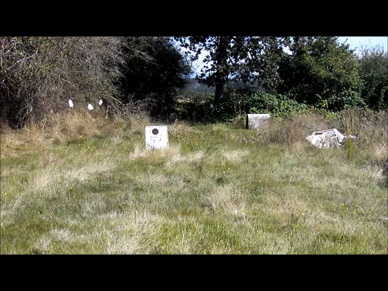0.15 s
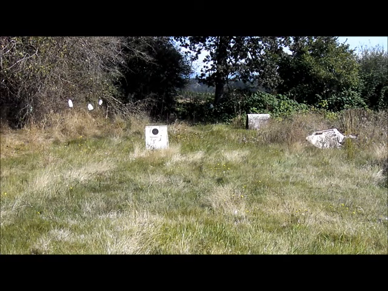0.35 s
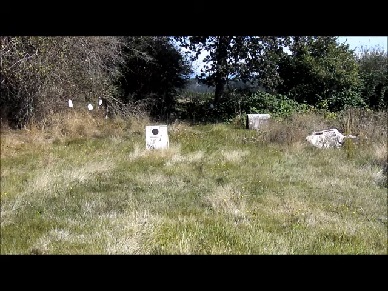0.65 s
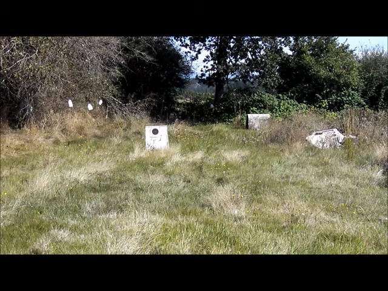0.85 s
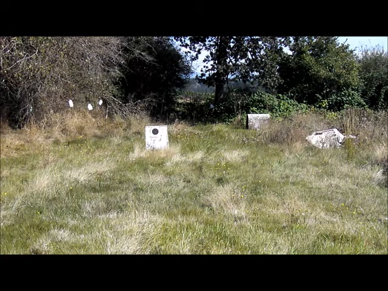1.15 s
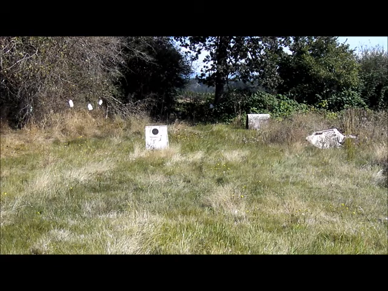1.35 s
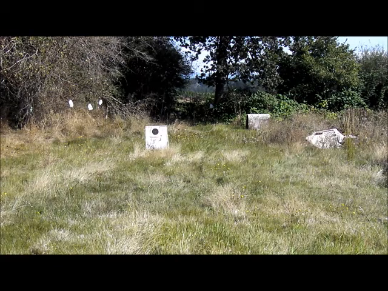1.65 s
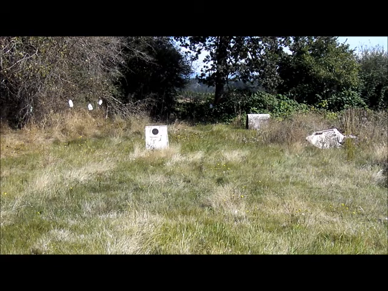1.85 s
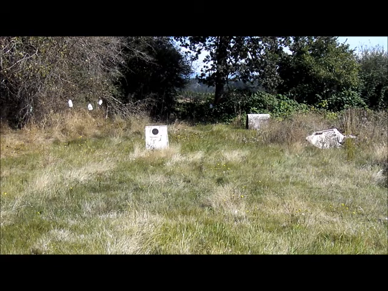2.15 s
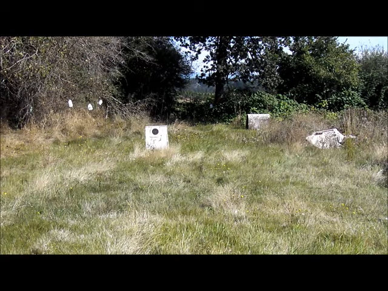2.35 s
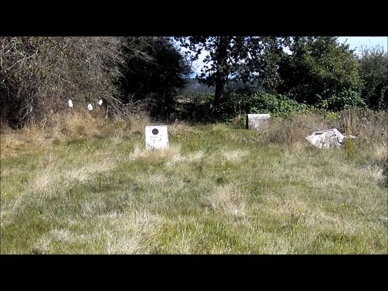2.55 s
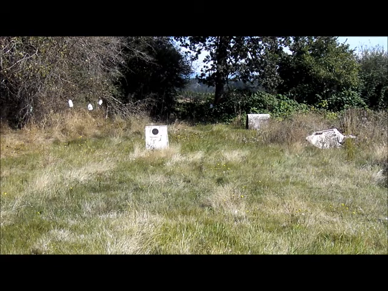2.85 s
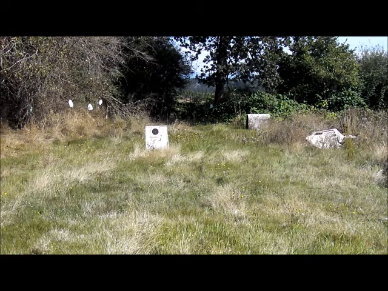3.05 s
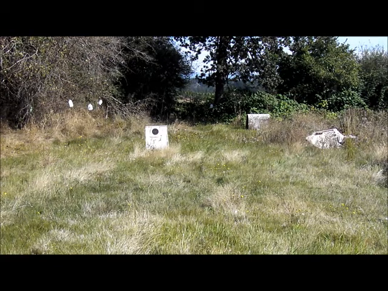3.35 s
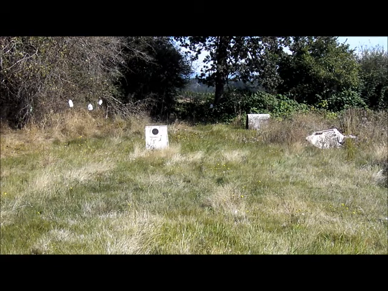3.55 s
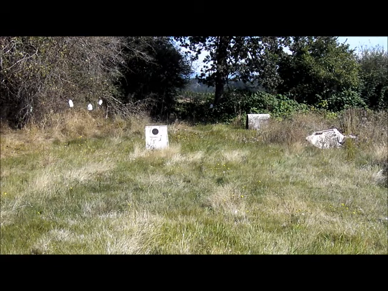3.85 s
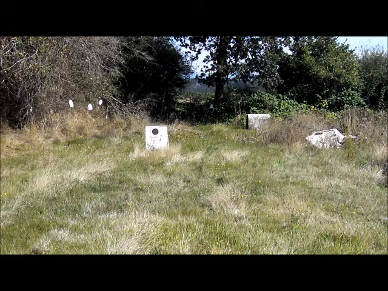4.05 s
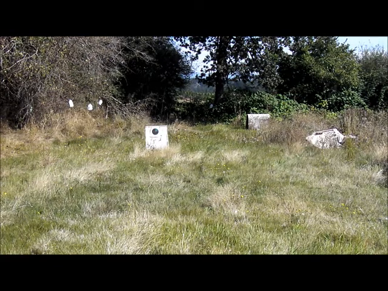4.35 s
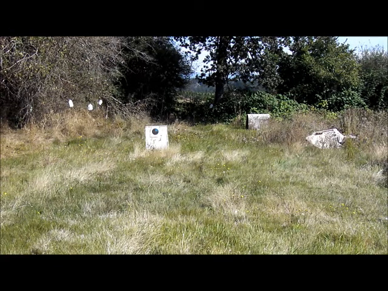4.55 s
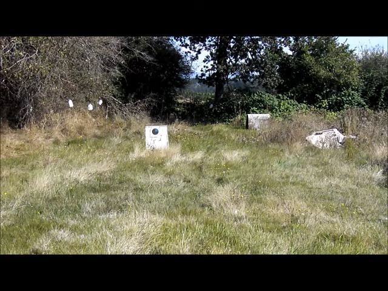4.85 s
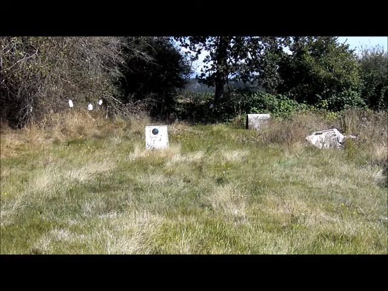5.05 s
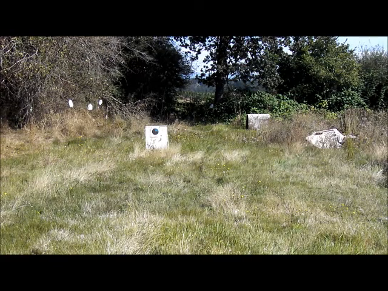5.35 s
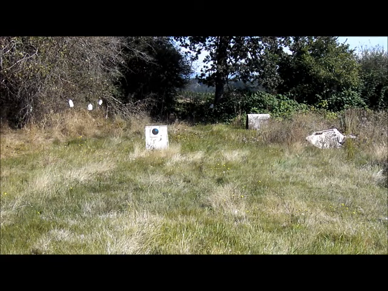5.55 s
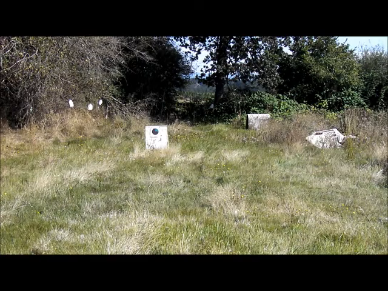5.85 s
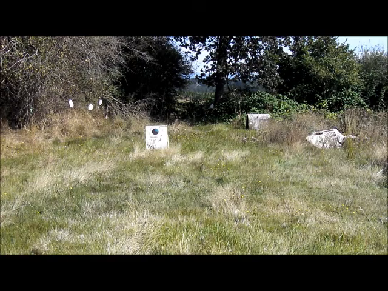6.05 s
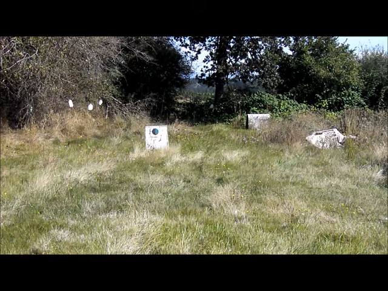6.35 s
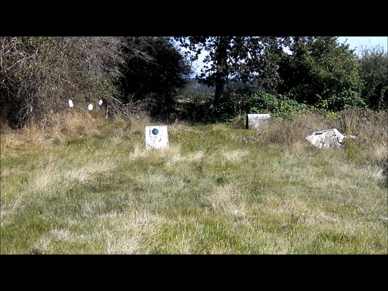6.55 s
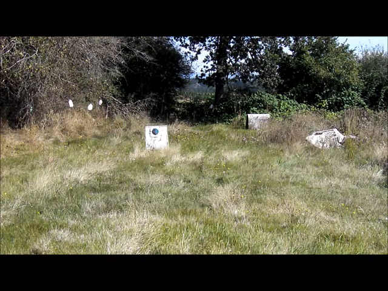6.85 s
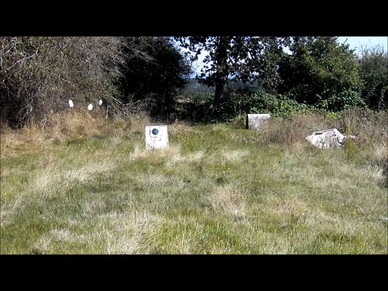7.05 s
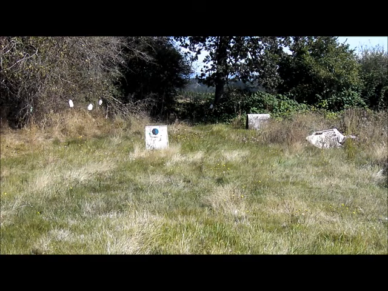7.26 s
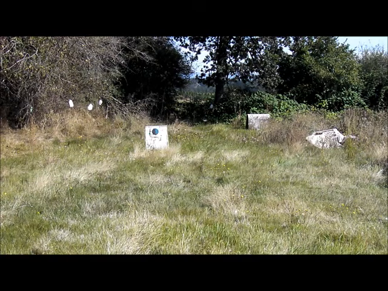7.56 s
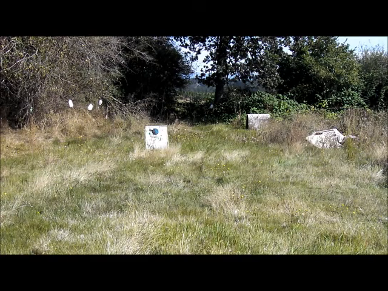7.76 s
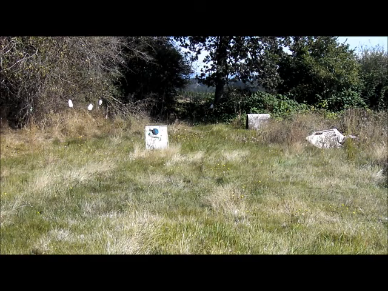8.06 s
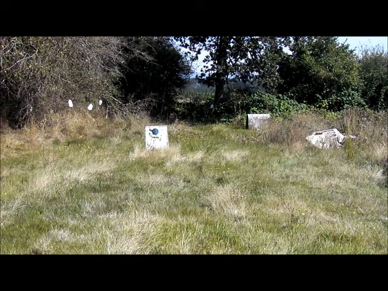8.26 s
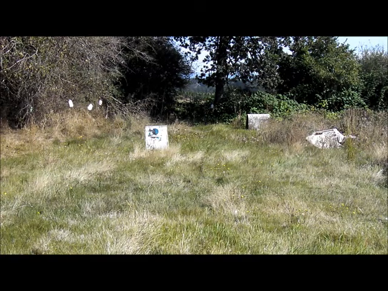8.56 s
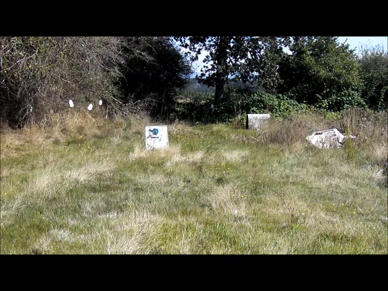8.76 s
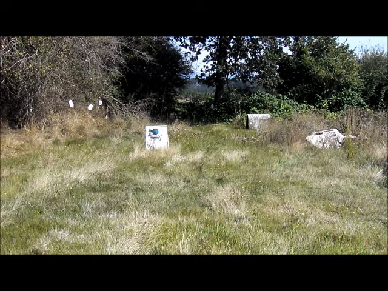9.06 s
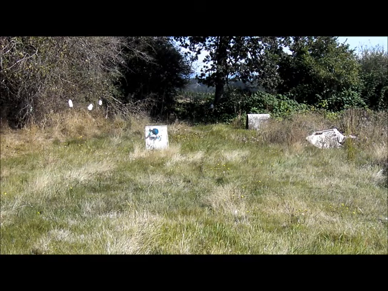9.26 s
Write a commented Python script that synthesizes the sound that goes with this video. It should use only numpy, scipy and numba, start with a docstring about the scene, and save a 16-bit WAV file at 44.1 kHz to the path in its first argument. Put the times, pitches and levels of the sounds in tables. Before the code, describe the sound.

In a quiet open field, gear rustles briefly. An electronic paintball marker then fires spaced single shots close to the microphone, followed by short bursts and finally a fast, even stream. Each shot is a sharp pop with a puff of gas and a bolt clack. The balls crack against a board a moment later, and trees and bushes return short echoes. The loudest peaks distort slightly.

```python
"""Paintball across a grassy field

An electronic paintball marker fires single shots, short bursts, then a steady stream at a board.
Each cycle is a valve knock, a hiss of gas, the muzzle blast and the clack of the returning bolt.
The balls crack on the board; trees and bushes throw the sound back. A rustle of gear comes first.
The microphone is close: its gain control ducks after loud blasts and the peaks distort."""
import sys
import numpy as np
from scipy import signal
from scipy.fft import rfft, irfft, next_fast_len
from scipy.io import wavfile
from scipy.ndimage import uniform_filter1d
from numba import njit

SR = 44100
rng = np.random.default_rng(int(sys.argv[2]) if len(sys.argv) > 2 else 0)


def inscribe(sig):
    """Save sig as 16-bit PCM at rate SR to the path in sys.argv[1].

    A 1-D sig is mono; a 2-D sig holds one channel per row.
    Samples are clipped to [-1, 1] before scaling.
    """
    pcm = np.round(np.clip(np.atleast_2d(sig).T, -1, 1) * 32767)
    wavfile.write(sys.argv[1], SR, pcm.astype(np.int16))


N = 414981

# tone of the open air: (f/Hz, level/dB)
AIR_COLOUR = [(18, -68), (30, -49), (64, -15), (134, -9.5), (165, -3.5), (194, -6.5), (449, -2), (499, -1),
              (1460, -10.5), (3400, -16.5), (3670, -15.5), (8080, -22), (14800, -23.5), (16000, -26)]
# tail of a shot in the trees: (delay t/s, level/dB), and its tone: (f/Hz, level/dB)
TREE_TAIL = [(0, -47), (0.01, 15.5), (0.05, 5), (0.111, 7), (.16, 6.5), (.2, -1), (.27, -1), (.36, -7.5),
             (.6, -13.5), (1.1, -34)]
TREE_COLOUR = [(100, -31), (330, -10.5), (560, -5.5), (750, -0.5), (1000, -0.5), (1700, -2.5), (2400, 2.5),
               (5500, 0.5), (9000, 4), (12500, 0.5), (16000, -5)]
# tail of a hit in the bushes: (delay t/s, level/dB), and its tone: (f/Hz, level/dB)
BUSH_TAIL = [(0, 31), (0.019, -43), (0.026, 8.5), (0.054, -0.5), (0.081, -5), (.15, -7), (.25, -17),
             (.45, -28), (.9, -45)]
BUSH_COLOUR = [(150, -16), (700, 0), (1300, 5.5), (1900, 9), (3200, 6), (6000, -2.5), (10000, -14.5),
               (16000, -24)]
# envelope of the gear rustle: (t/s, body level/dB, treble level/dB)
RUSTLE_ENVELOPE = [(0.285, -82, -77), (0.303, -26.5, -33), (0.323, -31.5, -48), (0.457, -18.5, -33),
                   (0.493, -21, -41), (0.553, -10.5, -26), (0.567, -18, -43), (0.649, -26, -54),
                   (0.7, -41, -69)]
# sharper jolts of the gear: (t/s, level/dB)
GEAR_JOLTS = [(0.347, -18), (0.4, -19), (0.523, -12.5), (0.54, -16), (0.655, -21), (0.715, -26.5),
              (0.755, -29)]
# dull rub and fine hiss of the gear: (f/Hz, level/dB)
RUB_COLOUR = [(47, -76), (80, -46), (151, -37), (176, -31), (339, -0.5), (451, -5), (562, -3), (641, -9),
              (747, -4), (971, -2.5), (1110, 1), (2140, -13), (2280, -17), (3860, -31.5), (15000, -68)]
HISS_COLOUR = [(200, -60), (1500, -3), (3500, 5), (6000, -4.5), (14000, -27)]
# balls landing after about .36 s of flight: (t/s, level/dB, ring f/Hz, echo level/dB)
BALL_HITS = [(2.4563, 4, 2320, -0.5), (3.0805, 5, 3130, -8), (3.7412, 3.5, 3940, -1.5),
             (4.4135, 5, 2200, 1.5), (4.466, -7, 2040, 1.5), (5.253, 6, 2420, 2.5), (5.7755, 5, 4480, 2.5),
             (6.0443, -2, 2820, -11), (6.2554, 0.5, 5360, -8.5), (6.3317, -8, 4460, -6),
             (6.425, -7, 3700, -0.5), (6.514, 5.5, 2100, 3.5), (6.575, -6, 4650, 5),
             (6.6775, -2.5, 3970, 0), (6.7394, -3, 3000, 0.5), (7.415, 2.5, 2850, 0), (7.469, -4, 2320, 0),
             (7.5667, -10, 2710, -6), (7.625, -12, 2610, -6.5), (7.7212, -14, 2970, -7),
             (7.8137, 0, 2530, -3), (7.897, 1.5, 2870, 0), (7.98, -5.5, 2714, -4), (8.051, -0.5, 2730, -10),
             (8.1535, 6, 2050, -3), (8.2316, 7, 2990, -7), (8.302, 5.5, 3774, -1.5), (8.3872, 5, 3700, -6),
             (8.4423, -1, 2660, 2.5), (8.5476, -0.5, 3600, 2), (8.6074, 3.5, 2226, -1.5),
             (8.6772, -4.5, 1500, -2), (8.7632, 4, 2970, 0), (8.8593, 3.5, 3300, -10), (8.9201, 4, 2080, 1),
             (8.994, -0.5, 2050, 0.5), (9.0783, -5, 3630, -0.5), (9.1653, -2.5, 4545, -0.5),
             (9.2462, -2.5, 2727, -4), (9.3223, -10, 2220, -5)]
# tone of the bursting paint, and the scooped mids of the board: (f/Hz, level/dB)
SPLAT_COLOUR = [(100, -58), (500, 6), (1200, 1), (2400, 10), (4500, 6.5), (7000, -2), (11000, -8),
                (16000, -7.5)]
BOARD_COLOUR = [(60, 5), (400, -4.5), (1000, -4), (2000, -1.5)]
# trigger and switch clicks: (t/s, level/dB)
TRIGGER_TICKS = [(0.3, -27), (2.048, -23), (2.059, -20), (4.883, -30), (7.005, -16)]
# runs of evenly spaced shots; the last two shots end the stream with a heavier thump:
# (first blast t/s, shot count, blast level/dB, gas level/dB, air push level/dB)
SHOT_RUNS = [(2.0824, 1, -4.5, -1.5, 5.5), (2.7371, 1, -6, -0.7, -36), (3.362, 1, -2.5, -1.5, 8.5),
             (4.0389, 3, -1.5, -3, -21), (4.8948, 1, -2, -4.5, -16), (5.4131, 1, -1, -1.5, 2),
             (5.6727, 1, -7, -3.5, -5), (5.9025, 7, -1, -1.5, -16), (7.0381, 5, -0.5, -3, -14),
             (7.4599, 14, 0, -2, -12), (8.5745, 9, 1.5, 1, -21), (9.286, 2, -5, -1.3, 3.5)]
# modes of barrel and body, and of the bolt on its stop: (f/Hz, level/dB, 60 dB decay t/s)
BARREL_MODES = [(336.6, 0, 0.016), (343, -17, 0.069), (412, -6, 0.018), (530.3, -11, 0.041),
                (882, -12, 0.031), (1175, -17, 0.022), (1970, -3.5, 0.0033)]
BOLT_MODES = [(1850, -15, 0.0094), (3453, -4, 0.019), (3670, -3.5, 0.011), (5100, -10, 0.0096),
              (8400, -8, 0.011)]
# tone of the gas, the valve knock and the ball's scrape: (f/Hz, level/dB)
GAS_COLOUR = [(200, -43), (700, 15.5), (1500, 9.5), (3000, -1), (4800, 0), (6000, 2), (8000, -8.5),
              (10000, -9.5), (16000, -14.5)]
KNOCK_COLOUR = [(150, -30), (350, -6), (700, 2.5), (950, 12.5), (1400, 4), (2500, -19)]
SCRAPE_COLOUR = [(300, 1), (900, -5), (1600, -16), (3000, -13), (9000, -23)]
# overall tone of the marker: less bass, a slight dip near 720 Hz, brighter top: (f/Hz, level/dB)
MARKER_COLOUR = [(40, -7.5), (140, -4.5), (280, 2.5), (560, -.5), (720, -1), (900, 0), (16000, 3.5)]

SHOT_PERIOD_S = .0791  # steady fire while the trigger is held


def undb(db):
    """Decibels to gain."""
    return 10 ** (np.asarray(db) / 20)


def unit(x):
    """Scale to rms 1."""
    return x / np.sqrt(np.mean(x ** 2))


def clock(seconds):
    """Sample times of a short sound."""
    return np.arange(int(seconds * SR)) / SR


def add(track, s, x):
    """Mix x into the track at time s."""
    i = int(round(s * SR))
    x = x[:max(len(track) - i, 0)]
    track[i:i + len(x)] += x


def colour(x, points):
    """EQ through (f/Hz, level/dB) points."""
    hz, db = np.transpose(points)
    size = next_fast_len(len(x) + SR // 10)
    f = np.maximum(np.arange(size // 2 + 1) * SR / size, 1)
    gain = undb(np.interp(np.log(f), np.log(hz), db))
    return irfft(rfft(x, size) * gain, size)[:len(x)]


def noise(points, size):
    """Coloured noise of rms 1."""
    return unit(colour(rng.standard_normal(size), points))


def drift(rate_hz):
    """Smoothed random steps of rms 1."""
    step = int(SR / rate_hz)
    stairs = np.repeat(rng.standard_normal(N // step + 1), step)
    return unit(uniform_filter1d(stairs, step)[:N])


def field_air(level_db=-47, waver_db=.5):
    """A quiet bed of open air, wavering slightly."""
    return undb(level_db + waver_db * drift(6)) * noise(AIR_COLOUR, N)


def tree_echo(shots, level_db=-17, patchy_db=2):
    """Foliage scatters each shot into countless small reflections: a patchy, fading tail."""
    delay, db = np.transpose(TREE_TAIL)
    t = clock(1)
    tail = noise(TREE_COLOUR, len(t))
    tail *= undb(np.interp(t, delay, db) + patchy_db * drift(90.4)[:len(t)])
    tail /= np.sqrt(np.sum(tail ** 2))
    return undb(level_db) * signal.fftconvolve(shots, tail)[:N]


def gear_rustle(grain_db=2.5, rub_db=-1, hiss_db=-1, catch_db=2, catch_s=.0034, catches_per_s=32):
    """Gear rubs as the marker is raised: dull grains, small random catches and a few jolts."""
    t = np.arange(N) / SR
    s, body_db, treble_db = np.transpose(RUSTLE_ENVELOPE)
    body, treble = (undb(np.interp(t, s, db, left=-120, right=-120)) for db in (body_db, treble_db))
    catch = np.exp(-clock(.04) / catch_s)
    snags = 1. * (rng.random(N) < catches_per_s / SR)
    catches = signal.fftconvolve(snags, catch)[:N]
    grains = unit(undb(grain_db * drift(260)) + undb(catch_db) * catches)
    force = undb(rub_db) * body * grains
    for when, db in GEAR_JOLTS:
        add(force, when, undb(db) * catch)
    friction = rng.standard_normal(N)
    rub = colour(force * friction, RUB_COLOUR) / np.std(colour(friction, RUB_COLOUR))
    hiss = undb(hiss_db) * treble * grains * noise(HISS_COLOUR, N)
    return rub + hiss


def shell_crack(hz, ring_db=3.5, ring_s=.0014, splat_db=2, burst_s=.00087, spray_db=-21, spray_s=.0096):
    """A shell bursts in about a millisecond, rings the board briefly and sprays paint."""
    t = clock(.04)
    tone = undb(ring_db) * np.sin(2 * np.pi * hz * t) * np.exp(-t / ring_s)
    splat = undb(splat_db) * np.exp(-(t / burst_s) ** 2 / 2)
    spray = undb(spray_db) * np.exp(-t / spray_s)
    return tone + (splat + spray) * noise(SPLAT_COLOUR, len(t))


def board_hits(crack_db=4, crush_s=.0006, wash_db=-24, patchy_db=2,
               slap_db=-11, slap_delay_s=.0462, slap_s=.0065):
    """Each ball flattens and cracks; bushes return a wash, a hard face behind the board one slap."""
    cracks, slaps, wash_power = np.zeros((3, N))
    t = clock(.9)
    delay, tail_db = np.transpose(BUSH_TAIL)
    tail = undb(wash_db + np.interp(t, delay, tail_db))
    for s, db, hz, echo_db in BALL_HITS:
        burst_at = s + crush_s
        add(cracks, burst_at, undb(crack_db + db) * shell_crack(hz))
        add(slaps, burst_at + slap_delay_s, undb(slap_db + echo_db) * np.exp(-t / slap_s))
        add(wash_power, burst_at, (undb(echo_db) * tail) ** 2)
    wash = np.sqrt(wash_power) * undb(patchy_db * drift(600))
    echoes = (slaps + wash) * noise(BUSH_COLOUR, N)
    return colour(cracks + echoes, BOARD_COLOUR)


def ring(modes, contact_s, scatter_db=1, detune=.018):
    """Modes rung by one push; a longer contact is duller, and no two pushes are quite alike."""
    t = clock(.06)
    scatter = rng.standard_normal((len(modes), 2)) * [scatter_db, detune]
    tones = sum(undb(db + extra_db - 60 * t / t60) * np.cos(2 * np.pi * hz * (1 + shift) * t)
                for (hz, db, t60), (extra_db, shift) in zip(modes, scatter))
    push = t * np.exp(-t / max(contact_s, 1 / SR))
    return signal.fftconvolve(tones, push / push.sum())[:len(t)]


def gas_hiss(lead_s, leak_db=-18, jet_db=2, rise_s=.00094, jet_s=.0054,
             gulp_db=3, gulp_s=.00286, after_db=-18, fade_s=.007):
    """Gas leaks past the ball, swells as it nears the muzzle, jets out in gulps and dies away."""
    t = clock(.08) - lead_s
    before, after = np.maximum(-t, 0), np.maximum(t, 0)
    slosh_db = gulp_db * np.cos(2 * np.pi * after / gulp_s)  # pressure sloshes along the barrel
    jet = undb(jet_db + slosh_db) * np.exp(-before / rise_s - (after / jet_s) ** 2 / 2)
    leak = np.where(t < 0, undb(leak_db), undb(after_db) * np.exp(-after / fade_s))
    return noise(GAS_COLOUR, len(t)) * (jet + leak)


def air_push(rise_s=.0017, width_s=.012):
    """Muzzle air strikes the microphone: a quick push that lets go more slowly."""
    t = clock(width_s)
    return t / rise_s * np.exp(1 - t / rise_s) * np.cos(np.pi / 2 * t / t[-1])


def firings(blast_scatter_db=.97, gas_scatter_db=.44, push_scatter_db=2):
    """Every shot, each a little different: (t/s, blast level/dB, gas level/dB, air push level/dB)."""
    shots = np.array([(s + k * SHOT_PERIOD_S, db, gas_db, air_db)
                      for s, count, db, gas_db, air_db in SHOT_RUNS for k in range(round(count))])
    scatter = [0, blast_scatter_db, gas_scatter_db, push_scatter_db]
    return shots + rng.standard_normal(shots.shape) * scatter


def marker(valve_db=-5, scrape_db=-17, shove_db=3, blast_db=14, ground_db=-12, push_db=7,
           cycle_s=.037, bolt_db=-8, clack_db=-7.5, rebound_db=-10):
    """The valve opens, gas drives the ball out, the blast rings the barrel and the bolt comes home."""
    out, t = np.zeros(N), clock(.012)
    scrape_swell = np.sin(np.pi * t / t[-1]) ** 2
    shove = np.exp(-((t - .001) / .00014) ** 2)
    for k, (s, db, gas_db, air_db) in enumerate(firings()):
        lead_s = .0195 if k == 0 else .0157  # time in the barrel, longer on the cold first shot
        valve_at = s - lead_s
        # the solenoid opens the valve, which knocks the body
        knock = colour(ring(BARREL_MODES, contact_s=.00007), KNOCK_COLOUR)
        add(out, valve_at, -undb(valve_db) * knock)
        add(out, valve_at, undb(gas_db) * gas_hiss(lead_s))
        # the ball scrapes down the barrel and shoves air out just ahead of the blast
        scrape = scrape_swell * noise(SCRAPE_COLOUR, len(t))
        add(out, s - t[-1], undb(scrape_db + gas_db) * scrape)
        add(out, s - .002, undb(shove_db + db) * shove)
        blast = -undb(db) * ring(BARREL_MODES, contact_s=.00005)
        add(out, s, undb(blast_db) * blast)
        add(out, s + .0067, -undb(ground_db) * blast)  # bounce off the ground
        add(out, s - .0005, undb(push_db + air_db) * air_push())
        # the bolt clacks home and rebounds softly off its bumper; from rest it sticks and is late
        home_at = valve_at + cycle_s + (.016 if k == 0 else 0)
        add(out, home_at, undb(bolt_db) * ring(BARREL_MODES, contact_s=.00007))
        add(out, home_at, undb(clack_db) * ring(BOLT_MODES, contact_s=.00002))
        add(out, home_at + .0031, undb(rebound_db) * ring(BARREL_MODES, contact_s=.0001))
    for s, db in TRIGGER_TICKS:
        add(out, s, undb(db) * ring(BOLT_MODES, contact_s=.00002))
    return colour(out, MARKER_COLOUR)


def scene():
    """Marker, board, echoes and gear over the quiet of the field."""
    shots = marker()
    return (shots + tree_echo(shots) + field_air() + board_hits() + gear_rustle())[None]


@njit
def follow(x, attack, hold, release):
    """Envelope that rises fast, holds, then lets go; times in samples."""
    out, level, wait = np.empty(len(x)), 0., 0.
    for i in range(len(x)):
        wait -= 1
        if x[i] > level:
            level += (x[i] - level) / attack
            wait = hold
        elif wait < 0:
            level += (x[i] - level) / release
        out[i] = level
    return out


def duck(x, threshold_db, attack_s, hold_s, release_s):
    """Turn the gain down while the envelope is above the threshold."""
    envelope = follow(np.abs(x), attack_s * SR, hold_s * SR, release_s * SR)
    return x / np.maximum(envelope / undb(threshold_db), 1)


def record(dry):
    """Slow gain control, a quick limiter, a bright microphone that overloads, trimmed lows and highs."""
    x = duck(dry[0], threshold_db=-1.5, attack_s=.0025, hold_s=.06, release_s=.034)
    x = duck(x, threshold_db=-2, attack_s=.00089, hold_s=.0015, release_s=.0068)
    x = colour(x, [(270, -3.5), (16000, 2)])  # bright tilt
    x = np.clip(x, -1, 1)
    x = colour(x, [(20, -7.5), (150, -1), (270, 0)])  # bass shelf
    high_cut = signal.ellip(8, .2, 70, 15700, fs=SR, output="sos")
    return signal.sosfilt(high_cut, x)[None]


dry = scene()
out = record(dry)
inscribe(out)
```